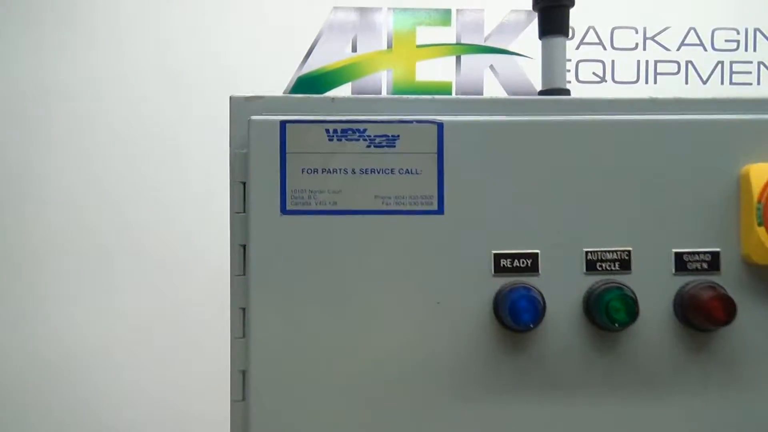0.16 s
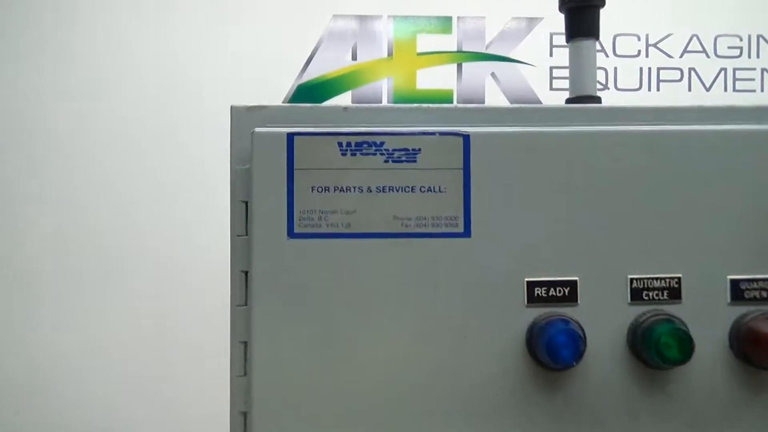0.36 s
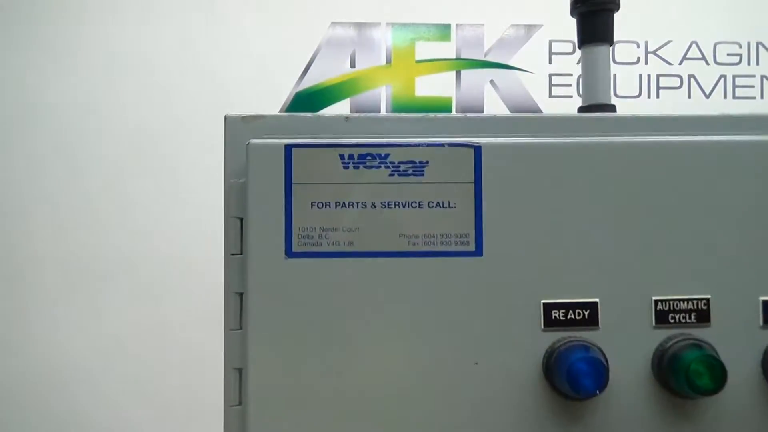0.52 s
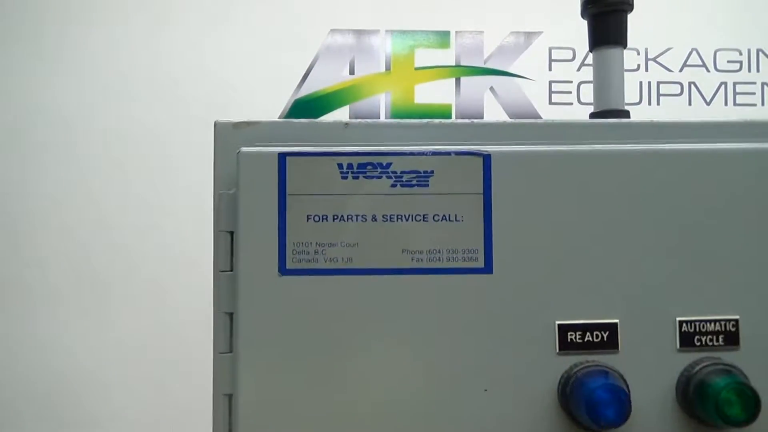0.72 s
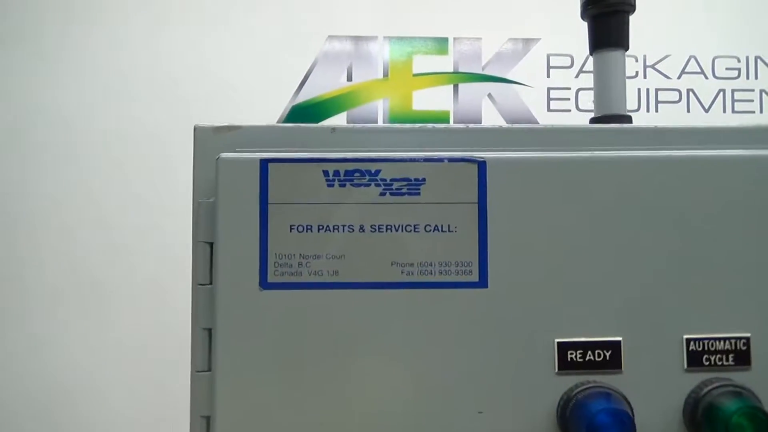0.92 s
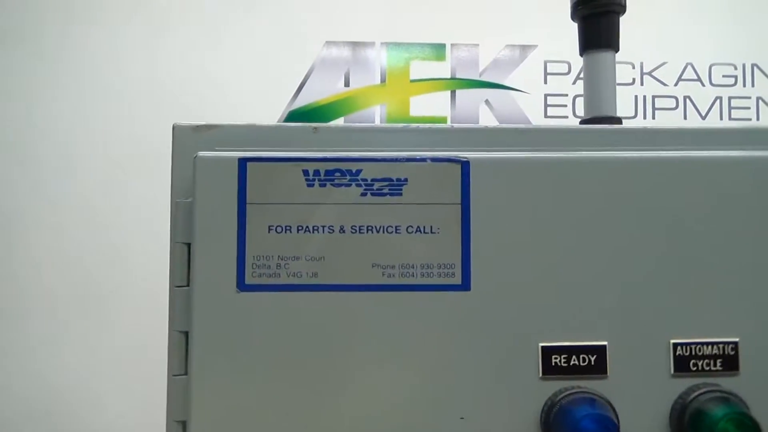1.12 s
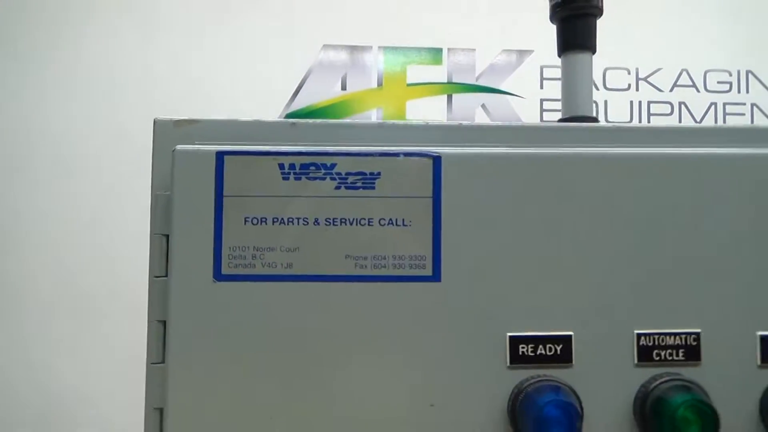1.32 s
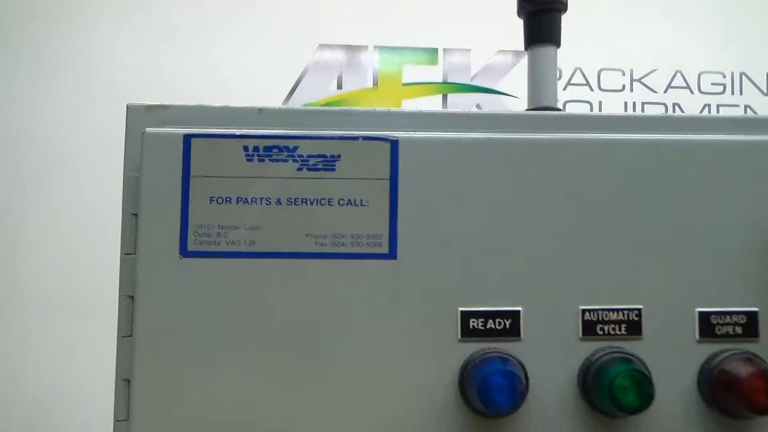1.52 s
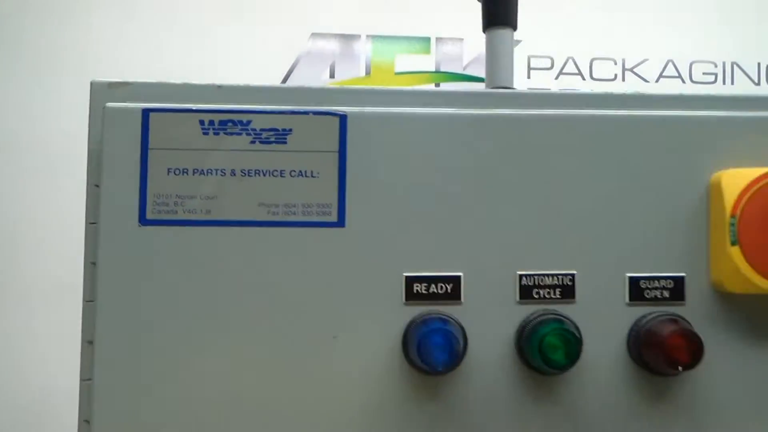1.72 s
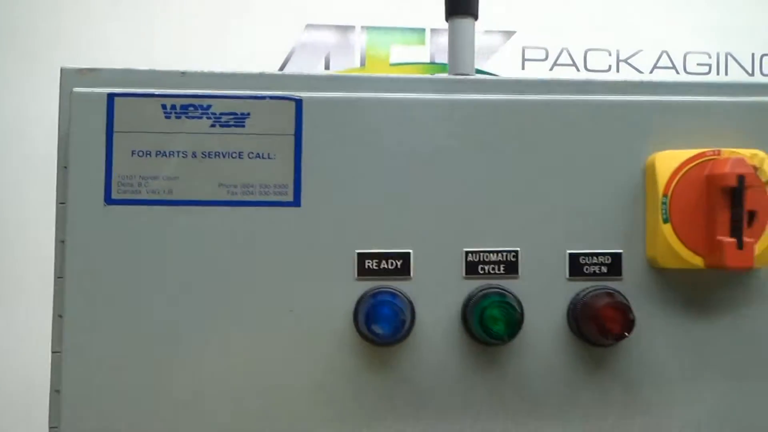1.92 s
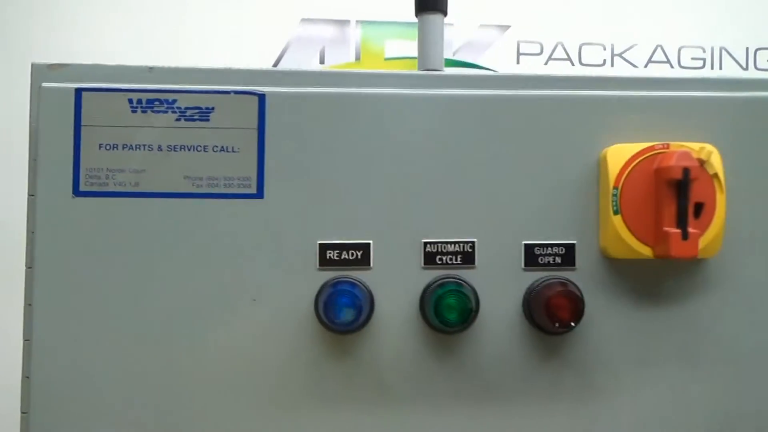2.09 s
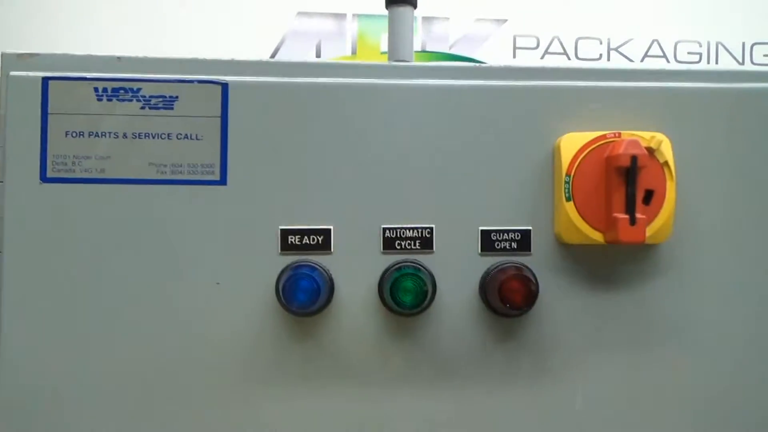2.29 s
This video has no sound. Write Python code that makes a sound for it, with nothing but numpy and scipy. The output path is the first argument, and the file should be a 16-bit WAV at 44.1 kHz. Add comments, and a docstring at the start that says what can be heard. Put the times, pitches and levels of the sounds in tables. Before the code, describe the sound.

As an earlier stroke's echo fades, a machine frame clanks twice in quick succession, then the reverberation dies away to soft regular pump knocks and steady hiss, heard in stereo from within an echoing industrial room.

```python
"""Packaging machine in a hard-walled workshop.

The machine clunks twice while the echo of an earlier stroke dies away. Each clunk is a dull nudge and a
cluster of metal contacts (noise cracks) over ringing frame modes, a panel boom and decaying hall noise.
Underneath, a small pump repeats pitched knocks about nine times a second, with a motor hum and air hiss.
"""
import sys
import numpy as np
from scipy import signal
from scipy.fft import rfft, irfft, next_fast_len
from scipy.io import wavfile
from scipy.ndimage import map_coordinates

SR = 44100
rng = np.random.default_rng(int(sys.argv[2]) if len(sys.argv) > 2 else 0)


def persist_wave(psi):
    """Save psi, clipped to +-1, as 16-bit WAV."""
    counts = np.round(np.clip(psi, -1, 1) * 32767).astype(np.int16)
    wavfile.write(sys.argv[1], SR, np.atleast_2d(counts).T)


N = 103635


def amp(db):
    """Amplitude ratio of a level in dB."""
    return 10 ** (np.asarray(db) / 20)


def unit(x):
    """x scaled to rms 1."""
    return x / np.sqrt(np.mean(x ** 2) + 1e-20)


def along(points, hz):
    """Interpolate (frequency [Hz], value) points on a log frequency axis."""
    point_hz, value = np.transpose(points)
    return np.interp(np.log(hz + 1), np.log(point_hz + 1), value)


def since(start_s):
    """Seconds since start_s, zero before it."""
    return np.maximum(np.arange(N) / SR - start_s, 0)


def rise(t, attack_s):
    """Exponential approach to 1."""
    return 1 - np.exp(-t / attack_s)


def fade(t, t60_s):
    """Gain of a free decay: -60 dB after t60_s."""
    return np.exp(-np.log(1000) * t / t60_s)


def wobble(knots_per_s):
    """Smooth random curve through normally distributed knots."""
    knots = rng.standard_normal(256)
    return map_coordinates(knots, [np.arange(N) * knots_per_s / SR], mode="wrap")


def filtered(x, response):
    """x with its spectrum multiplied by response(hz)."""
    size = next_fast_len(N + SR // 2)
    spectrum = rfft(x, size) * response(np.fft.rfftfreq(size, 1 / SR))
    return irfft(spectrum, size)[..., :N]


def low_cut(x, hz):
    """Second-order high-pass."""
    return signal.sosfilt(signal.butter(2, hz, "high", fs=SR, output="sos"), x)


def noise(colour, width, tilt_db=0, side_db=0):
    """Stereo noise of rms 1: colour(hz) in dB, tilt in dB per octave, width as side over mid."""
    def response(hz):
        octaves = np.log2(np.maximum(hz, 400) / 1500)  # no tilt change below 400 Hz
        side_gain = amp(along(width, hz) + side_db)
        return amp(colour(hz) + tilt_db * octaves) * np.array([np.ones_like(hz), side_gain])

    mid, side = filtered(rng.standard_normal((2, N)), response)
    return unit(np.array([mid + side, mid - side]))


# Machine strokes: (time [s], hall level [dB], frame ring [dB], panel boom at half amplitude [dB],
# hall brightness [dB/octave], hall hold [s], hollow body [dB])
STROKES = [(-.13, -35.5, -45, -45.5, -0.5, 0.12, -0.5), (.220, -29.5, -38, -47.5, 0.93, 0.069, 3.5),
           (.577, -26, -31.5, -46.5, 0.18, 0.027, 0.5)]
# Hall colour: (frequency [Hz], relative density [dB per Hz])
HALL_COLOUR = [(59, -58), (100, -28), (146, -16.5), (192, -12.5), (233, -16.5), (281, -10.5), (362, -13.5),
               (477, -8.5), (519, 0.5), (614, -1), (917, 0), (1260, -5.5), (1620, -2.5), (1920, -5.5),
               (2930, -4.5), (6660, -16.5), (11100, -22), (13100, -23.5), (15500, -52)]
# Hall decay: (frequency [Hz], T60 [s])
HALL_T60 = [(150, 1.28), (600, 0.7), (1300, 1.23), (2700, 1.37), (4500, 1.21), (8000, 0.67), (14000, 0.57)]
# Hall width: (frequency [Hz], side over mid [dB])
HALL_SIDE = [(150, -18), (350, -15.5), (700, -10), (2500, -8), (5000, -7.5), (9000, -13), (13000, -72)]
HALL_BUILD_S, HALL_EARLY_FALL_DB_PER_S = 0.016, 30
BODY_HZ, BODY_WIDTH_HZ = 567, 300  # hollow part of a clunk
CHATTER_KNOTS_PER_S, CHATTER_DB = 80, 1.0  # uneven first reflections


def hall():
    """Dense reflections as noise: a brief hold, then each frequency decays at its own T60."""
    out = np.zeros((2, N))
    for start_s, level_db, _, _, tilt_db, hold_s, body_db in STROKES:
        def colour(hz):
            body = np.exp(-((hz - BODY_HZ) / BODY_WIDTH_HZ) ** 2)
            return along(HALL_COLOUR, hz) + body_db * body

        hz, frame_s, z = signal.stft(noise(colour, HALL_SIDE, tilt_db), SR, nperseg=512)
        decay_s = np.maximum(frame_s - start_s - hold_s, 0)
        z = z * fade(decay_s, along(HALL_T60, hz)[:, None])
        reflections = signal.istft(z, SR)[1][:, :N]

        t = since(start_s)
        chatter_db = CHATTER_DB * wobble(CHATTER_KNOTS_PER_S) * np.exp(-t / (2 * hold_s))
        early_db = level_db + chatter_db - HALL_EARLY_FALL_DB_PER_S * np.minimum(t, hold_s)
        out += rise(t, HALL_BUILD_S) * amp(early_db) * reflections
    return out


PHASE_KNOTS_PER_S, PHASE_WANDER_RAD = 30.37, 0.8


def ring(t, hz, t60_s, attack_s):
    """One decaying mode with a slightly unsteady phase."""
    phase = 2 * np.pi * (hz * t + rng.random()) + PHASE_WANDER_RAD * wobble(PHASE_KNOTS_PER_S)
    return np.sin(phase) * fade(t, t60_s) * rise(t, attack_s)


# Ringing modes of the frame: (frequency [Hz], level relative to frame ring [dB])
FRAME_MODES = [(530, -7), (560, -9), (676, -19), (783, -2.5), (816, -5), (902, -2.1), (939, -11.5),
               (1128, -3.5), (1413, -9.5), (1561, -15), (1647, -0.5), (1677, -2), (1865, -14), (1992, -6.5),
               (2501, -5), (2840, -3.5), (3270, -10), (4274, -10)]
FRAME_ATTACK_S, FRAME_T60_S, FRAME_SIDE_DB = 0.0017, 0.64, -11.5
BOOM_HZ, BOOM_ATTACK_S, BOOM_T60_S = 154, 0.063, 0.47


def frame_modes(t, ring_db):
    """Sum of the steel frame's modes, all struck together."""
    return sum(amp(ring_db + db) * ring(t, hz, FRAME_T60_S, FRAME_ATTACK_S) for hz, db in FRAME_MODES)


def frame():
    """Every stroke rings the steel frame and makes a panel boom."""
    out = np.zeros((2, N))
    for start_s, _, ring_db, boom_db, *_ in STROKES:
        t = since(start_s)
        mid = frame_modes(t, ring_db)
        side = frame_modes(t, ring_db)
        out += mid + amp(FRAME_SIDE_DB) * np.array([side, -side])
        out += amp(boom_db) * 2 * ring(t, BOOM_HZ, BOOM_T60_S, BOOM_ATTACK_S)
    return out


# Soft knocks in each pump turn: (time into turn [s], pitch [Hz], mean peak level [dB], rise [s])
KNOCKS = [(.008, 252, -51, 0.005), (0.016, 160, -63, 0.011), (.059, 613, -60, 0.01),
          (.060, 362, -49.5, 0.0022), (.066, 182, -55.5, 0.0063), (.085, 449, -57, 0.0058),
          (.085, 668, -62.5, 0.0091), (.085, 240, -57.5, 0.014), (.099, 403, -58, 0.0069),
          (0.102, 191.6, -55, 0.01), (.107, 680, -49, 0.00082)]
# Motor hum: (frequency [Hz], rms level [dB])
HUM = [(119.5, -73.5)]
TURN_S = 0.11052
KNOCK_SCATTER_DB, KNOCK_SCATTER_KNOTS_PER_S = 1.06, 8.7
PUMP_ROOM_DB, PUMP_ROOM_T60_S = -12.5, 0.67  # echo level relative to the knocks


def pump():
    """The same soft knocks come round every turn and smear in the room; the motor hums."""
    t = since(0)
    knocks = np.zeros(N)
    for offset_s, hz, level_db, rise_s in KNOCKS:
        age_s = (t - offset_s) % TURN_S
        swell = (age_s / rise_s * np.exp(1 - age_s / rise_s)) ** 2
        level = amp(level_db + KNOCK_SCATTER_DB * wobble(KNOCK_SCATTER_KNOTS_PER_S))
        knocks += level * swell * np.sin(2 * np.pi * (hz * age_s + rng.random()))

    # echo: noise in the colour of one turn, following the decaying knock energy
    lingering = signal.fftconvolve(knocks ** 2, fade(t, PUMP_ROOM_T60_S) ** 2)[:N]
    one_turn = knocks[:round(TURN_S * SR)]
    wash = signal.fftconvolve(rng.standard_normal(N), one_turn, mode="same")
    echo = unit(np.sqrt(np.abs(lingering)) * wash) * np.std(knocks)

    hum = sum(amp(db) * np.sqrt(2) * np.sin(2 * np.pi * (hz * t + rng.random())) for hz, db in HUM)
    return knocks + amp(PUMP_ROOM_DB) * echo + hum


# Hiss colour: (frequency [Hz], relative density [dB per Hz])
AIR_COLOUR = [(15, -62), (25, -40), (44, -12), (91, -7.5), (107, -16), (240, 0), (297, -3.5), (378, -3.5),
              (469, -10), (509, -16.5), (598, -7.5), (722, -11), (782, -8.5), (997, -9.5), (1080, -7.5),
              (1300, -11.5), (3630, -8.5), (8130, -19.5), (15500, -21)]
# Low-mid shaping added to the hiss colour: (frequency [Hz], gain [dB])
AIR_LOW_SHAPE = [(60, -4.5), (120, -3.5), (250, -6), (600, 4), (1000, -1)]
# Hiss width: (frequency [Hz], side over mid [dB])
AIR_SIDE = [(60, -42), (180, -16.5), (550, -12), (1650, -8), (4970, -3.5), (15000, -26)]
AIR_END_DB, AIR_SLOPE_DB_PER_S = -55.5, -1
AIR_PAN_DB = -0.35  # left gain; right gets the opposite


def air():
    """Air hiss as coloured noise, falling slightly in level and leaning right."""
    t = since(0)
    hiss = noise(lambda hz: along(AIR_COLOUR, hz) + along(AIR_LOW_SHAPE, hz), AIR_SIDE)
    level = amp(AIR_END_DB + AIR_SLOPE_DB_PER_S * (t - t[-1]))
    return level * hiss * amp([[AIR_PAN_DB], [-AIR_PAN_DB]])


# Colour of the nudges and first clunk's contacts: (frequency [Hz], relative density [dB per Hz])
FIRST_CRACK = [(88, -44), (150, -8.5), (388, -17), (540, 3.5), (860, 0), (1000, -22), (1130, 0), (1630, -5),
               (2410, 0.5), (2700, -5.5), (3980, -11), (5030, -12), (5440, -15.5), (11400, -30),
               (15500, -47)]
# Linkage taking up its slack: (time [s], level [dB], upper edge [Hz])
NUDGES = [(.2, -41, 900), (0.5564, -35, 3000)]
NUDGE_ATTACK_S, NUDGE_T60_S = 0.0015, 0.22


def nudges():
    """Linkage slack closing before each clunk: a dull noise bump with rolled-off treble."""
    out = np.zeros((2, N))
    for start_s, level_db, edge_hz in NUDGES:
        def colour(hz):
            return along(FIRST_CRACK, hz) - 10 * np.log10(1 + (hz / edge_hz) ** 8)

        t = since(start_s)
        bump = noise(colour, HALL_SIDE)
        out += amp(level_db) * bump * rise(t, NUDGE_ATTACK_S) * fade(t, NUDGE_T60_S)
    return out


# Colour of the second clunk's contacts: (frequency [Hz], relative density [dB per Hz])
SECOND_CRACK = [(88, -63), (150, -35), (411, -24), (530, -15), (766, 1.5), (1000, -18), (1130, -2),
                (1400, -17), (1660, 2), (2180, -9), (3220, -12), (3480, -9.5), (3690, -11), (8660, -25),
                (13300, -36), (15500, -53)]
# Metal contacts: (time [s], level [dB], brightness [dB/octave])
CONTACTS = [(0.215, -32, 3), (0.22, -23, .3), (0.2286, -27, 7), (0.2691, -27.5, -2.5), (0.317, -30, 2),
            (0.572, -30, 6), (0.5764, -18, -0.4), (.584, -18, 0.5), (0.596, -28, 4.5), (0.625, -30, 2)]
SECOND_FROM_S = 0.5
CONTACT_ATTACK_S, CONTACT_T60_S = 0.0007, 0.048
CONTACT_SIDE_DB = -4  # narrower than the hall


def contacts():
    """Each metal contact is a short, dense noise crack in the colour of its clunk."""
    out = np.zeros((2, N))
    for start_s, level_db, tilt_db in CONTACTS:
        t = since(start_s)
        colour = FIRST_CRACK if start_s < SECOND_FROM_S else SECOND_CRACK
        crack = noise(lambda hz: along(colour, hz), HALL_SIDE, tilt_db, CONTACT_SIDE_DB)
        out += amp(level_db) * crack * rise(t, CONTACT_ATTACK_S) * fade(t, CONTACT_T60_S)
    return out


CONTACT_LOW_CUT_HZ = 175


def scene():
    """Sum of machine, hall, pump and air."""
    impacts = low_cut(nudges() + contacts(), CONTACT_LOW_CUT_HZ)
    return hall() + frame() + pump() + air() + impacts


LOW_CUT_HZ, TOP_HZ = 26, 15800


def record(dry):
    """Thin the deep bass and remove everything from TOP_HZ up."""
    return filtered(low_cut(dry, LOW_CUT_HZ), lambda hz: hz < TOP_HZ)


dry = scene()
out = record(dry)
persist_wave(out)
```